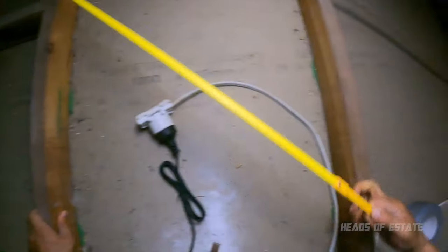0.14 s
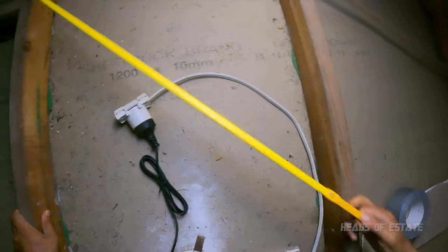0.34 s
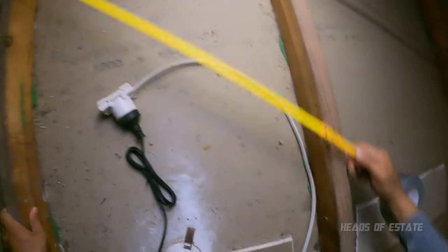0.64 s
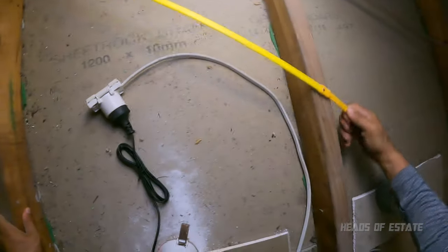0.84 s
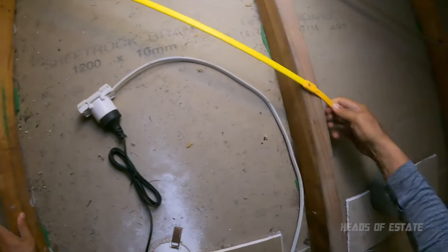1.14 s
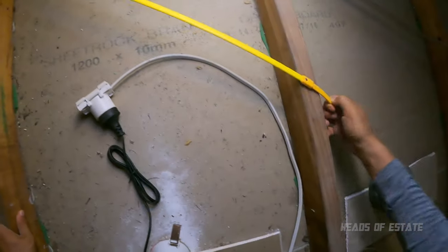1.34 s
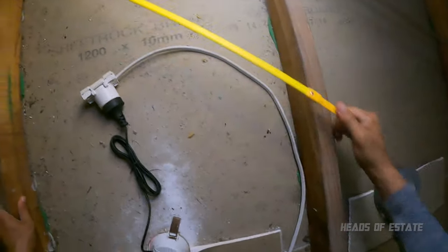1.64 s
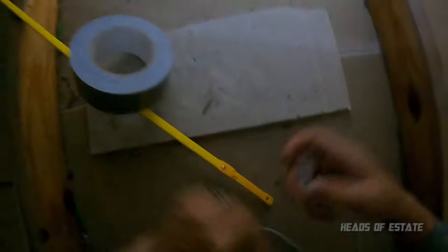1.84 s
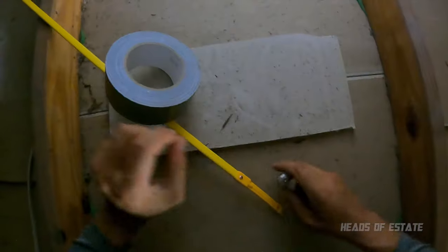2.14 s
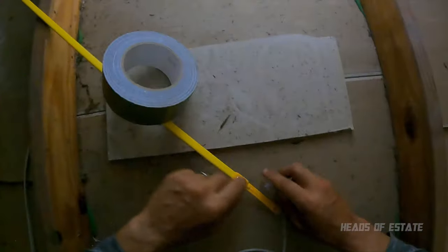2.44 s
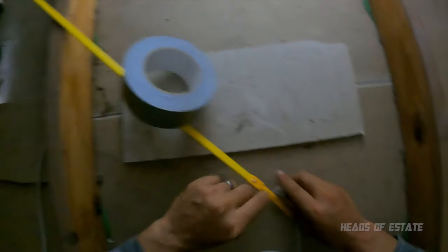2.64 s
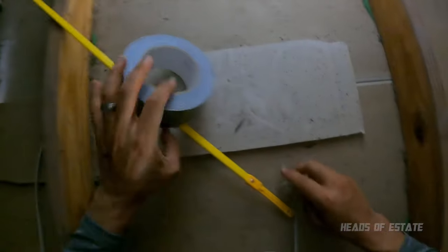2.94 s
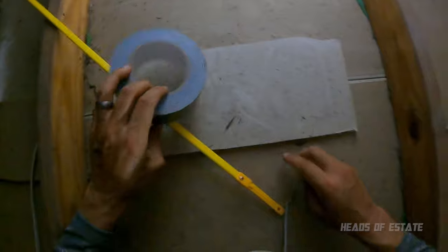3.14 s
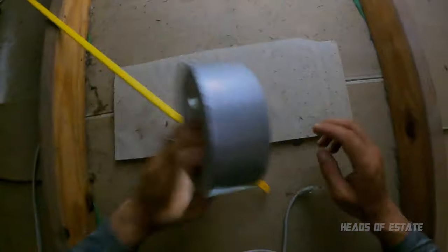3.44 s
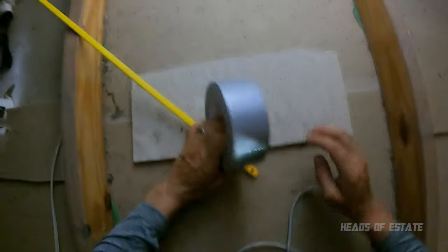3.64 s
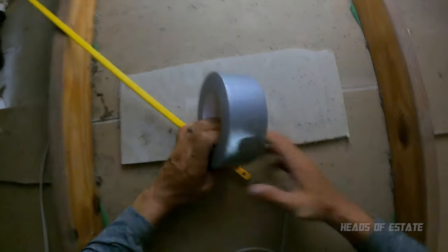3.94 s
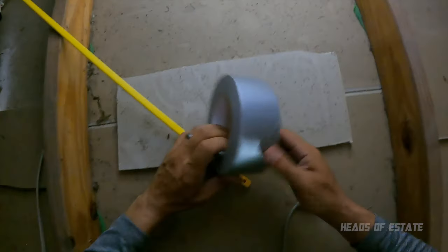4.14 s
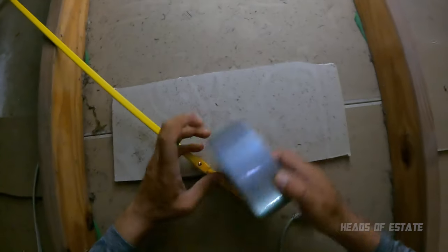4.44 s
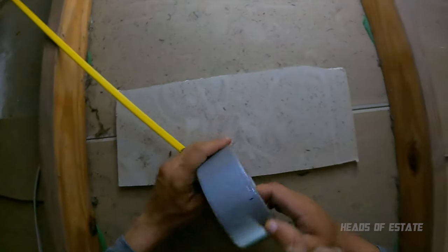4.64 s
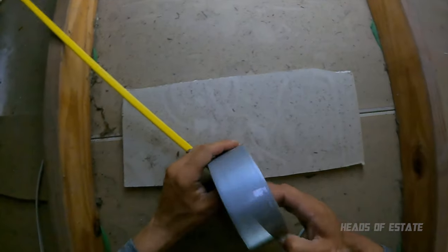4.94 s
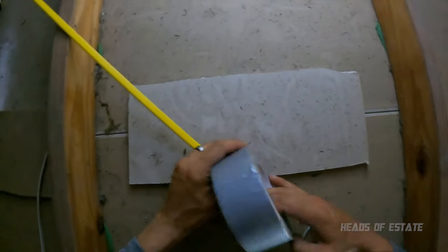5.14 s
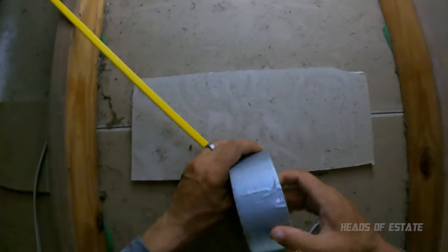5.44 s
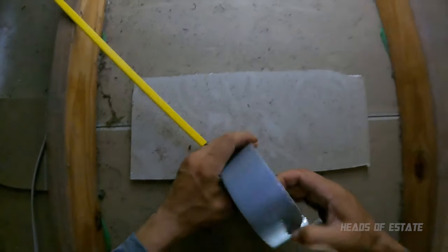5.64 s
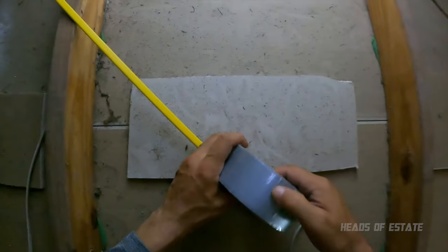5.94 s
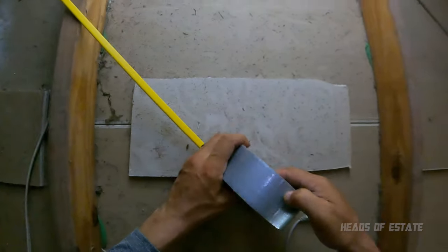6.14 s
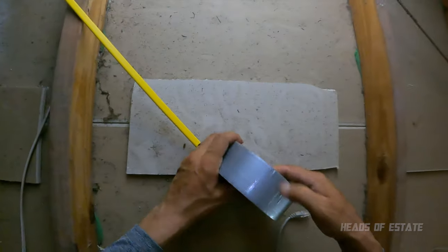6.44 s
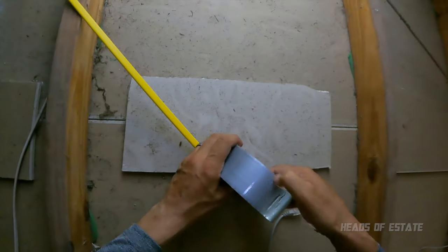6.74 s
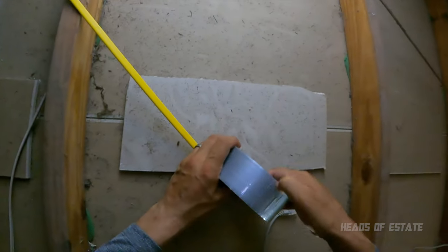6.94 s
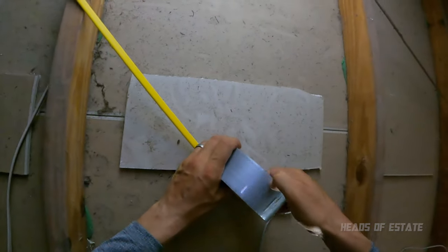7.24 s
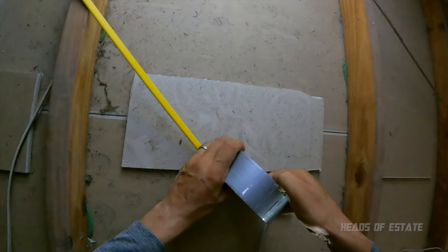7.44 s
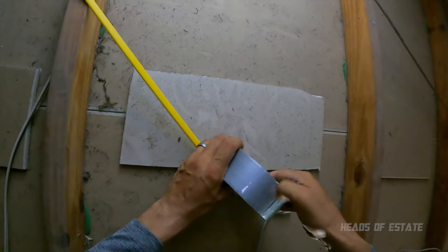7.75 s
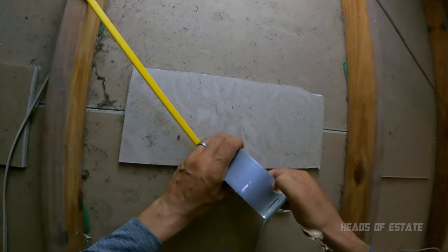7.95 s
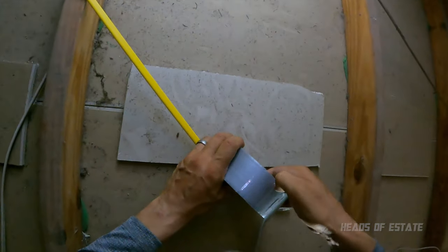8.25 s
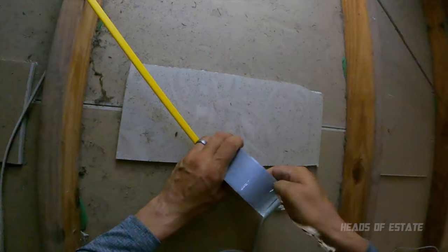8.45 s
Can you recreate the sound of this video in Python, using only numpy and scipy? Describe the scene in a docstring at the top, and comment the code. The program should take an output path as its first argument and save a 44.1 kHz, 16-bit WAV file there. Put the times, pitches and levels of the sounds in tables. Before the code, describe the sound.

In a low roof space, a rod scrapes and knocks over plasterboard while knees thud on the joists. A roll of duct tape is then slid and picked up with hollow knocks and sharp snaps. Fingers rub the roll, a nail ticks at its edge, and tape lifts in short snaps. Sleeves rustle close to a head-worn stereo microphone, and machines below give a low pulsing hum.

```python
"""A low roof space, heard from a head-worn stereo camera with the hands working close to its microphones.
A rod and a tape roll scrape over plasterboard, their friction ringing the board; sleeves rustle.
Tape lifts off the roll in short snaps, board and roll give hollow knocks, and knees on the joists
thud through the ceiling. Farther off, below, two machines hum nearly in unison and beat."""
import sys
import numpy as np
from scipy import signal
from scipy.fft import rfft, irfft, next_fast_len
from scipy.io import wavfile
from scipy.ndimage import uniform_filter1d, map_coordinates

SR = 44100
rng = np.random.default_rng(int(sys.argv[2]) if len(sys.argv) > 2 else 0)


def store_pcm(level_fs):
    """Save levels as 16-bit WAV."""
    pcm = np.round(np.clip(level_fs, -1, 1) * 32767).astype(np.int16)
    wavfile.write(sys.argv[1], SR, np.atleast_2d(pcm).T)


N = 379701
T = np.arange(N) / SR
CONTROL_T = np.arange(0, N / SR + .01, .002)  # coarse time grid for slow gains

# strokes of hand, rod, roll and cloth:
# (time [s], rise [s], fall [s], scrape level [dB], rustle re scrape [dB], weight re scrape [dB])
STROKES = [(.09, 0.18, 0.59, -43, -27, 2.5), (0.134, 0.031, 0.022, -48, -11, 4.5),
           (0.259, 0.052, 0.22, -40.5, -6.5, -4), (.56, 0.044, 0.072, -51, -10, 11.5),
           (0.648, 0.017, 0.15, -46, -2.5, 1), (.94, 0.065, 0.033, -40.5, -13, 2.5),
           (1.05, 0.12, 0.26, -41, -17, -2), (1.201, 0.083, 0.06, -40.5, -7, 5),
           (1.41, 0.04, 0.05, -38.5, -11, 1), (1.56, 0.11, 0.034, -33.5, -12.5, -1.5),
           (1.702, 0.12, 0.056, -29, -9, -0.5), (1.854, 0.012, 0.042, -38, -8, 5),
           (1.9, 0.025, 0.068, -34, -11.5, 2.5), (1.95, 0.062, 0.079, -30.5, -10.5, -4),
           (2.241, 0.15, 0.091, -33, -9, -15), (2.33, 0.16, 0.088, -30, -14, 3),
           (2.49, 0.063, 0.17, -31, -12, -2.5), (2.64, 0.026, 0.023, -34, -12, -12),
           (2.891, 0.06, 0.065, -38, 2, 7.5), (2.95, 0.062, 0.14, -23.5, -13, -4.5),
           (3.07, .07, 0.17, -28.5, -12.5, 1.5), (3.25, 0.1, 0.11, -30, -13, -1),
           (3.366, 0.053, 0.019, -33, -5, 4.5), (3.64, 0.04, 0.064, -35, -26, 11),
           (4.07, 0.28, 0.094, -56.5, -0.5, 1.5), (4.19, 0.0098, 0.089, -54.5, 3, -4),
           (4.3, 0.12, 0.18, -58, 1, 5), (4.43, 0.021, 0.082, -56, 3.5, 2),
           (4.54, 0.064, 0.095, -45, -9.5, -3), (4.65, 0.045, 0.042, -42, -7.5, 0.5),
           (4.78, 0.13, 0.68, -39.5, -9, -4.5), (5.0, 0.048, 0.052, -33.5, -6, -4.5),
           (5.149, 0.15, 0.032, -40.5, 3.5, 1.5), (5.42, 0.083, 0.13, -34, -10.5, -1),
           (5.56, 0.059, 0.11, -32.5, -12, 3.5), (5.66, .06, 0.16, -32, -9.5, -7),
           (5.77, 0.069, 0.03, -33, -4, 1.5), (5.92, 0.06, 0.031, -53, 0, -4),
           (6.09, 0.12, 0.12, -40.5, -26, 2), (6.26, 0.11, 0.092, -45, -1, 9),
           (6.4, 0.099, 0.069, -45, 1.5, 13), (6.522, 0.059, 0.021, -47, 5.5, 13),
           (6.7, 0.081, 0.055, -35.5, -7, -4), (6.85, 0.15, 0.15, -29, -8.5, -9),
           (7.02, 0.067, 0.077, -30, -10, -4), (7.25, 0.38, 0.3, -35.5, -14, -12),
           (7.55, 0.052, 0.0083, -42, 4.5, 7), (7.9, 0.09, 0.088, -38, -23, -9),
           (8.03, 0.08, 0.078, -34, -8, 1), (8.16, 0.059, 0.066, -35.5, -18, -5),
           (8.45, 0.18, 0.022, -38, -9, -11)]
# faint rubbing between strokes: (time [s], level re hum [dB])
IDLE_RUB = [(0, -21), (1.84, -28.5), (1.86, -26), (3.5, -17), (4.2, -30.5), (5.85, -21.5), (8.46, -23),
            (8.49, -38), (8.61, -20)]
# brief flares of the finest rustle: (time [s], half-width [s], level [dB])
FLARES = [(.1, 0.028, -47), (0.27, 0.061, -46), (1.368, 0.028, -46), (1.683, .05, -38), (2.854, 0.074, -45),
          (4.06, .03, -52), (4.292, 0.034, -48), (4.65, .02, -53), (5.6, 0.14, -44), (5.738, .04, -39),
          (5.921, 0.025, -40.5), (6.09, 0.015, -47), (6.27, 0.014, -61), (6.403, .02, -42),
          (6.487, 0.017, -43), (7.624, 0.028, -38), (8.437, 0.023, -42), (8.465, 0.011, -36)]
# plasterboard resonances: (frequency [Hz], width [Hz], level [dB])
BOARD_MODES = [(612, 42, 5), (786, 35, 0), (950, 110, 2), (1380, 150, 1), (1840, 45, 10), (2570, 130, 3),
               (3100, 120, -2), (4200, 250, -2), (5400, 400, -2), (6600, 200, -2), (7700, 250, 0)]
# scrape pressed on the board: (frequency [Hz], level [dB])
BOARD_SCRAPE = [(500, -99), (850, 2), (1420, 1), (1660, 0.5), (1840, -3.5), (2120, -3.5), (4500, -15.5),
                (5850, -21.5), (9900, -120)]
# the board's body with weight on it: (frequency [Hz], level [dB])
BOARD_BODY = [(120, -14), (200, -5), (394, -10.5), (839, -17.5), (950, -29.5), (1240, -54), (2090, -120)]
# the rod's duller tone: (frequency [Hz], gain [dB])
ROD_COLOUR = [(1700, 1), (1840, 0), (2000, 3), (2600, -4.5), (5000, -0.5)]
# tone of the roll turned between the hands: (frequency [Hz], gain [dB])
HAND_COLOUR = [(350, 0.5), (550, 4), (780, -7.5), (1000, -1), (2000, 0.5), (2600, 1.5), (3300, 0)]
# fingers on the lifted roll: (frequency [Hz], level [dB])
ROLL_SCRAPE = [(500, -88), (850, -10), (1040, 0), (1270, -7.5), (1440, -3.5), (1650, -5.5), (2100, -9),
               (2750, -12), (3200, -18), (4500, -25), (5850, -24.5), (9900, -120)]
# body of the roll held in the air: (frequency [Hz], level [dB])
ROLL_BODY = [(120, -44), (200, -2), (318, -14.5), (425, -8), (800, -22), (1040, -99), (1760, -120)]
# rustle of sleeves and surfaces: (frequency [Hz], level [dB])
RUSTLE = [(1760, -5), (3000, -6), (3270, -2.5), (3760, -2), (5950, -4), (7430, -8), (8500, -15),
          (11000, -38), (18700, -120)]
# finest rustle, as heard through the microphone ports: (frequency [Hz], level [dB])
FINE_RUSTLE = [(4710, -15), (8000, -6), (10900, -11), (12300, -11.5), (13800, -22), (14800, -38)]
# quick slides on tape: (time [s], length [s], level [dB], hiss centre [Hz], fine rustle re hiss [dB])
SLIDES = [(0.341, 0.053, -38.5, 4730, -25), (1.694, 0.069, -34.5, 4400, -19),
          (3.26, 0.051, -24.5, 6030, -12), (5.134, 0.042, -33.5, 6000, -1),
          (6.577, 0.043, -36.5, 8750, -15), (7.54, 0.15, -44, 5000, -19)]
# snaps of tape, nail and rod:
# (time [s], peak [dB], ring [Hz], rattle re crack [dB], treble slope [24 dB/octave], left re right [dB])
SNAPS = [(0.433, -11, 7200, -4, -0.41, 2), (0.798, -18.5, 2730, -8, -0.79, -1),
         (2.0402, -10, 2200, -19, -0.93, 0), (3.3866, -2, 5340, -14, -0.81, -2),
         (3.5595, -0.5, 6150, -17, -0.59, 0), (3.5789, -7, 2950, -5, -0.93, -1),
         (3.627, -21, 3030, -8, -0.66, 3), (3.768, -43, 3610, -17.5, -0.33, -11),
         (4.2884, -26, 5770, -3, 0.12, -2), (4.6394, -29, 2500, -4, -0.0056, -1),
         (5.246, -25, 2150, -7, -0.6, -1), (7.6058, -13, 5500, -7, -0.096, -1),
         (7.6105, -14, 2330, -8, -0.53, 0), (7.612, -22, 3000, -6, 0.0021, -4),
         (7.62, -7.5, 12000, -6, 0.11, -0.5), (8.264, -24, 2520, -12, -0.78, 0),
         (8.4586, -10.5, 12000, -12, -0.19, -5), (8.4614, -5.5, 2420, -13, -0.28, -3),
         (8.4651, -8, 3870, -9, 0.04, 1)]
# hollow knocks on board and roll: (time [s], peak [dB], first ring [Hz], second ring [Hz],
# second re first [dB], t60 [s], rattle re peak [dB], left re right [dB])
KNOCKS = [(.3205, -20.5, 656, 1336, 0, 0.11, -14, 8), (.333, -18.5, 321, 1330, 1, 0.087, -13, 14),
          (.354, -15, 644, 1280, -2, 0.031, -20, 2), (.3595, -10, 594, 1245, -2, 0.049, -25, 7),
          (.368, -15.5, 608, 930, -5, 0.089, -32, 7), (0.434, -20.5, 1230, 2230, -5, 0.038, -6.5, 17),
          (0.446, -15.5, 930, 765, -11, 0.058, -13.5, 9), (.798, -18, 804, 1487, -4.5, 0.096, -14, 8),
          (2.0405, -8.5, 650, 1890, 2, 0.015, -19, 1), (2.043, -14, 890, 1220, -6, 0.072, -14.5, 4),
          (2.506, -20.5, 1070, 1480, -13, 0.027, -13, 2), (2.647, -20.5, 680, 1060, -3, 0.044, -12, 1),
          (3.388, -10, 1082, 1240, -4, 0.078, -20, 3), (3.56, -10, 796, 1160, -3, 0.036, -17, 1),
          (3.579, -9, 780, 1100, 1, 0.089, -13.5, -1), (3.596, -7.5, 320, 780, -14, 0.067, -30, -1),
          (4.181, -39, 800, 1190, -16, 0.091, -28, -2), (5.2465, -24, 500, 1650, -5, 0.019, -5.5, -1),
          (5.253, -24.5, 750, 840, -7, 0.072, -27, 3), (5.267, -21, 430, 950, -7, 0.044, -25, 2),
          (5.291, -28, 560, 1400, -19, 0.037, -23, 3), (6.3495, -22, 570, 1340, 11, 0.015, -22, 4),
          (7.6055, -15, 1206, 1400, 3, 0.041, -22.5, 1.5), (8.460, -15.5, 487, 1300, 13, 0.017, -20, 2)]
# fingernail on the roll: (time [s], peak [dB], low ring [Hz], high ring [Hz], high re low [dB])
NAIL_TICKS = [(6.0823, -26.5, 2800, 3720, -3), (6.0853, -23, 1880, 2800, 2), (6.238, -32, 2000, 3900, 4),
              (6.3494, -18, 2720, 3500, 1.5)]
# dull blows on the ceiling: (time [s], peak [dB], most excited frequency [Hz], t60 scale [ratio])
THUDS = [(0.3205, -12.5, 200, 0.5), (0.328, -6, 70, 1.2), (0.355, 1.5, 130, 0.64), (0.408, -6.5, 80, 1.7),
         (1.877, -27, 96.9, 0.9), (2.041, -11.5, 200, 0.39), (3.597, -1.5, 215, 0.29),
         (3.612, -3, 63.3, 1.4), (3.658, -9, 64, 1.7), (4.184, -28, 42.7, 1.1), (5.247, -20, 260, 0.34),
         (5.25, -7, 40.4, 1.5), (5.54, -8, 157, 0.44), (5.71, -13, 80.7, 0.82), (5.842, -11.5, 40.4, 0.97),
         (8.463, -19, 48, 0.6), (8.494, -9, 41.7, 0.63)]
# low modes of the ceiling: (frequency [Hz], level [dB], base t60 [s])
CEILING_MODES = [(40.4, 1.5, 0.16), (64.9, -2, 0.59), (123, 4.5, 0.15), (191, -14, 0.03), (217, 0, 0.21),
                 (283, 6.5, 0.27)]
# weight shifts on the frame: (time [s], rise [s], fall [s], deep bass [dB], upper re deep bass [dB])
WEIGHT_SHIFTS = [(.04, 0.028, 0.026, -22, -6.5), (.14, 0.062, 0.09, -21, -8), (.35, 0.022, 0.19, -20.5, 1),
                 (.87, 0.029, 0.18, -34, 3.5), (1.1, 0.081, 0.084, -40, -13),
                 (1.209, 0.043, 0.071, -29, 2.5), (1.3, 0.039, 0.056, -17.5, -16),
                 (1.57, 0.076, 0.16, -19.5, -31), (1.71, 0.038, 0.043, -23.5, -3),
                 (1.871, 0.011, 0.097, -15, -7.5), (2.5, 0.022, 0.061, -23, 3),
                 (2.58, 0.1, 0.088, -21, -10), (3.082, 0.33, 0.062, -16.5, -22), (3.29, 0.15, 0.1, -21, -6),
                 (3.62, 0.054, 0.11, -20, -4), (3.84, 0.094, 0.082, -21, -25),
                 (4.21, 0.042, 0.039, -27, -20), (4.44, 0.17, 0.12, -32, -15),
                 (4.8, 0.076, 0.36, -32.5, -15), (5.13, 0.098, 0.043, -28, -10),
                 (5.3, 0.068, 0.062, -17, -13), (5.57, 0.072, 0.049, -27.5, 8),
                 (5.74, 0.052, 0.033, -16, -21), (5.89, 0.056, 0.088, -15.5, -42),
                 (6.27, 0.056, 0.66, -25.5, -5), (6.75, 0.13, 0.14, -21.5, -14),
                 (7.2, 0.085, 0.32, -24.5, -6.5), (7.62, 0.3, 0.3, -24, -3), (8.2, 0.13, 0.27, -24.5, -26),
                 (8.5, 0.059, 0.088, -11.5, -33)]
# the frame's deep bass: (frequency [Hz], level [dB])
FRAME_DEEP = [(8, -55), (19, -20), (28, 1.5), (40, 0.5), (65, -4), (82, -0.5), (96, -10.5), (130, -67),
              (300, -120)]
# the frame's upper bass: (frequency [Hz], level [dB])
FRAME_UPPER = [(40, -120), (100, -5.5), (116, 1.5), (160, -0.5), (220, -4.5), (260, -8.5), (330, -14),
               (700, -120)]
# timing of the hum's beat: (start of stretch [s], time of a beat minimum [s])
BEAT_TIMING = [(0, .34), (1.845, 2.036)]
# machine whine: (frequency [Hz], level re hum [dB])
WHINE = [(425.3, -36)]
# the background sinks around loud moments and creeps back: (time [s], sink [s], return [s], depth [dB])
DIPS = [(.2, .4, 0.25, 6.5), (1.33, 0.29, 0.091, -0.5), (6.05, 0.12, 0.16, 1.5), (0.601, 0.28, 0.68, 17.5),
        (2.15, 0.37, 0.34, 12.5), (3.4, 0.44, 0.61, 7), (4.049, 0.29, 0.71, 26.5), (5.4, 0.44, 0.96, 8.5),
        (7.09, 0.055, 0.047, 2), (8.06, .06, 0.044, 3.5), (8.62, 0.092, 1, 9.5)]
# decay of the roof space: (frequency [Hz], t60 [s])
ROOF_DECAY = [(150, 0.77), (1000, 0.46), (4000, 0.082), (12000, 0.12)]
# stereo width at the microphones: (frequency [Hz], side re mid [dB])
STEREO_WIDTH = [(30, -27), (60, -34), (110, -24.5), (200, -18.5), (370, -12.5), (690, -10), (1260, -11),
                (2320, -6.5), (4260, -10.5), (7830, -8.5), (11000, -8.5), (14400, 0)]
# treble loss in the microphone ports: (frequency [Hz], gain [dB])
MIC_PORTS = [(100, -1.5), (7000, -3), (9000, -7.5), (12500, -12.5), (14000, -18), (15000, -39.5)]

ROD_UNTIL_S, IN_HAND_FROM_S, LIFTED_FROM_S = 1.845, 4.45, 5.85
STROKE_SHAPE, RATTLE_SHAPE = 2.18, 1  # exponents for swells()
IDLE_RUSTLE_DB, IDLE_WEIGHT_DB = -5.5, 2  # re the idle scrape
RATTLE_RUSTLE_DB, RATTLE_WEIGHT_DB = -13.5, 6  # re the rattle's scrape
RATTLE_FALL, RING_LASTS = 0.56, 0.93  # shares of a knock's t60
FINE_DB, FINE_SLOPE = -4, 1.25  # the finest rustle follows the rustle, more steeply
SNAP_T60_S, TICK_T60_S = 0.052, 0.011
DEEP_REST_DB, UPPER_REST_DB = -7.5, -15.5  # the frame at rest, re hum
PRESS_DB, DEEP_DIP_SHARE = -4.5, 0.4  # upper bass re stroke weight; share of the dips in the deep bass
HUM_DB, ROOF_DB, TOP_HZ = -16.5, -13.0, 15000


def rubbing(scrape, rustle, fine, weight):
    """Close up, friction of rod, roll and sleeves drives the board's resonances and hollow body."""
    rings = lambda f: sum(abs(peak(f, hz, width)) ** 2 * amp(db) for hz, width, db in BOARD_MODES)
    hollow = lambda f: .9 + rings(f)
    faint = lambda f: 3.9 + rings(f)  # a higher floor, so the resonances stand out less
    on_board = friction(lambda f: spectrum(BOARD_SCRAPE, f) * hollow(f), grit_db=1.0, rate=330)
    on_roll = friction(lambda f: spectrum(ROLL_SCRAPE, f) * faint(f), grit_db=1.0, rate=1100)
    cloth = friction(lambda f: spectrum(RUSTLE, f) * faint(f), grit_db=1.0, rate=890)
    fine_hiss = friction(fine_colour, grit_db=1.0, rate=260, lag=.3)
    board_body = friction(lambda f: spectrum(BOARD_BODY, f) * hollow(f), grit_db=1.5, rate=27)
    roll_body = friction(lambda f: spectrum(ROLL_BODY, f), grit_db=0.5, rate=110)
    on_board = np.where(T < ROD_UNTIL_S, coloured(on_board, ROD_COLOUR), on_board)
    on_board = np.where(T > IN_HAND_FROM_S, coloured(on_board, HAND_COLOUR), on_board)
    board_body = np.where(T > IN_HAND_FROM_S, coloured(board_body, HAND_COLOUR), board_body)
    lifted = T > LIFTED_FROM_S
    surface = scrape * np.where(lifted, on_roll, on_board) + rustle * cloth
    body = weight * np.where(lifted, roll_body, board_body)
    flutter = amp(1.05 * wobble(30))
    return flutter * (scratchy(surface, depth_db=2) + fine * fine_hiss + body) * pan(0.8)


def stroke_gains():
    """Strokes, and loose things shaking after knocks, lift the rubbing; only strokes press the frame."""
    rattles = [(s + 0.0055, .002, RATTLE_FALL * t60, db + rattle_db, RATTLE_RUSTLE_DB, RATTLE_WEIGHT_DB)
               for s, db, *_, t60, rattle_db, _ in KNOCKS]
    s, rise, fall, db, rustle_db, weight_db = np.transpose(STROKES + rattles)
    is_stroke = np.arange(len(s)) < len(STROKES)
    shape = swells(s, rise, fall, np.where(is_stroke, STROKE_SHAPE, RATTLE_SHAPE)[:, None])
    idle_db = hum_level_db() + np.interp(T, *np.transpose(IDLE_RUB))
    scrape = summed(shape, db, idle_db)
    rustle = summed(shape, db + rustle_db, idle_db + IDLE_RUSTLE_DB)
    fine = amp(FINE_DB) * summed(shape, db + FINE_SLOPE * rustle_db, idle_db + FINE_SLOPE * IDLE_RUSTLE_DB)
    weight = summed(shape, db + weight_db, idle_db + IDLE_WEIGHT_DB)
    pressure = summed(shape[is_stroke], (db + weight_db)[is_stroke], idle_db + IDLE_WEIGHT_DB)
    flare_s, width, flare_db = np.transpose(FLARES)
    flares = summed(swells(flare_s, width, width), flare_db, -np.inf)
    return scrape, rustle, np.hypot(fine, flares), weight, pressure


def tape_slides():
    """A fingertip or the roll slides fast over smooth tape: a short band of hiss."""
    out = np.zeros((2, N))
    hiss = friction(np.ones_like, grit_db=3.5, rate=170)
    for s, length, db, hz, fine_db in SLIDES:
        span = slice(round(s * SR) - SR // 4, round(s * SR) + SR // 4)
        swell = np.exp(-((T[span] - s) / (0.6 * length)) ** 4)
        colour = lambda f: abs(peak(f, hz, 0.63 * hz)) ** 2 + amp(fine_db) * fine_colour(f)
        out[:, span] += amp(db) * swell * unit(filtered(hiss[:, span], colour))
    return out


def snaps():
    """Tape, nail or rod snaps: a sharp crack with a short ring and a dying rattle."""
    out, t = np.zeros((2, N + SR)), T[:SR // 3]
    for s, db, hz, rattle_db, slope, pan_db in SNAPS:
        noise = rng.standard_normal((3, len(t)))  # shared, left, right
        crack = attack(t, 0.0004) * decay(t, 0.0044) * noise[0]
        rattle = amp(rattle_db) * decay(t, SNAP_T60_S) * (noise[0] + 1.03 * noise[1:])
        tilt = lambda f: (1j * f / (1800 + 1j * f)) ** 2 * (1 + 1j * f / 3500) ** (4 * slope)
        colour = lambda f: tilt(f) * (1 + 1.7 * peak(f, hz, 0.26 * hz))
        place(out, s, filtered(crack + rattle, colour), db, pan_db)
    return out[:, :N]


def knocks():
    """A hard push and chatter excite the board and two hollows of the struck thing, which ring on."""
    out, t = np.zeros((2, N + SR)), T[:SR // 3]
    board = lambda f: sum((-1) ** k * peak(f, hz, width + 120)
                          for k, (hz, width, _) in enumerate(BOARD_MODES[:6]))
    for s, db, hz1, hz2, second_db, t60, _, pan_db in KNOCKS:
        noise = rng.standard_normal((3, len(t)))
        push = 2.26 * decay(t, 0.00046) + decay(t, t60) * (noise[0] + 0.067 * noise[1:])
        hollows = lambda f: peak(f, hz1, 0.19 * hz1) - amp(second_db) * peak(f, hz2, 0.13 * hz2)
        chatter = filtered(push, lambda f: hollows(f) + 0.021 * board(f))
        ring = sine(hz1, t) - amp(second_db) * sine(hz2, t)
        ring *= attack(t, 0.00043) * decay(t, RING_LASTS * t60)
        place(out, s, chatter / abs(chatter).max() + amp(-2) * ring / abs(ring).max(), db, pan_db)
    return out[:, :N]


def nail_ticks():
    """A nail catches the tape's edge: a click and two short pitched rings."""
    out, t = np.zeros((2, N + SR)), T[:SR // 20]
    for s, db, low_hz, high_hz, high_db in NAIL_TICKS:
        ring = sine(low_hz, t) + amp(high_db) * sine(high_hz, t, rng.uniform(0, np.pi))
        ring *= attack(t, .0006) * decay(t, TICK_T60_S)
        click = 0.7 * decay(t, 0.0029) * rng.standard_normal(len(t))
        place(out, s, ring + click, db, pan_db=-1.5)
    return out[:, :N]


def knee_thuds():
    """A soft blow on a joist rings the ceiling's low modes, most those near its own pitch."""
    out, t = np.zeros(N + SR), T[:SR]
    for s, db, centre_hz, t60_scale in THUDS:
        ring = np.zeros(SR)
        for hz, mode_db, t60 in CEILING_MODES:
            gain = amp(mode_db + rng.normal(0, 0.67) - 11.4 * abs(np.log2(hz / centre_hz)))
            ring += gain * decay(t, t60 * t60_scale) * sine(hz * rng.normal(1, 0.0067), t)
        out[round(s * SR):][:SR] -= amp(db) * attack(t, 0.00076) * ring / abs(ring).max()
    return out[:N]


def frame_rumble(pressure):
    """The frame underfoot groans as weight shifts; strokes press into its upper bass."""
    s, rise, fall, db, upper_db = np.transpose(WEIGHT_SHIFTS)
    hum_db, shape = hum_level_db(), swells(s, rise, fall)
    deep = friction(lambda f: spectrum(FRAME_DEEP, f), grit_db=0.0, rate=8)
    upper = friction(lambda f: spectrum(FRAME_UPPER, f), grit_db=1.0, rate=30)
    deep_gain = summed(shape, db, HUM_DB + DEEP_DIP_SHARE * (hum_db - HUM_DB) + DEEP_REST_DB)
    upper_gain = summed(shape, db + upper_db, hum_db + UPPER_REST_DB)
    return deep_gain * deep + np.hypot(upper_gain, amp(PRESS_DB) * pressure) * upper


def machine_hum(low_hz=97.96, high_hz=99.97):
    """Two machines below the ceiling beat twice a second; a faint whine rides above."""
    starts, minima = np.transpose(BEAT_TIMING)
    beat_t = T - minima[np.searchsorted(starts, T, "right") - 1]
    low, high = (sine(hz, beat_t, 0.08 * wobble(6)) for hz in (low_hz, high_hz))
    whine = sum(amp(db + 8.1 * wobble(8)) * sine(hz, T, wobble(5.7)) for hz, db in WHINE)
    return amp(hum_level_db() + 0.36 * wobble(16)) * (low - 0.95 * high + whine)


def hum_level_db():
    """The hum's level with its dips, which the other steady sounds follow."""
    s, sink, back, depth_db = np.transpose(DIPS)
    return HUM_DB - np.interp(T, CONTROL_T, depth_db @ swells(s, sink, back))


def roof_reverb(x):
    """The low roof space answers; each frequency dies at its own speed."""
    hz, t, bands = signal.stft(rng.standard_normal((2, SR // 2)), SR, nperseg=256)
    tail = signal.istft(bands * decay(t, along(ROOF_DECAY, hz)[:, None]), SR, nperseg=256)[1]
    tail = 2.0 * tail[0] + .5 * tail  # mostly common to both microphones
    return signal.fftconvolve(x, tail / np.linalg.norm(tail[0]), axes=1)[:, :N]


def friction(response, grit_db, rate, lag=0.58):
    """Stereo noise of small uneven catches; lag is the share of the side due to delay between ports."""
    size = next_fast_len(N + 8192)
    f = np.fft.rfftfreq(size, 1 / SR)
    catches = rng.standard_normal((2, N)) * amp(grit_db * wobble(rate))
    mid, diffuse = rfft(catches, size) * response(f)
    side = (np.sqrt(1 - lag ** 2) * diffuse - 1j * lag * mid) * spectrum(STEREO_WIDTH, f)
    mid, side = irfft([mid, side], size)[:, :N]
    return np.array([mid + side, mid - side]) / np.std(mid)


def scratchy(x, depth_db):
    """Short resonances come and go: random gain in patches about 130 Hz wide and 40 ms long."""
    bands = signal.stft(x, nperseg=1024)[2]
    patches = rng.standard_normal(bands.shape[1:])
    for axis in (0, 1):
        patches = uniform_filter1d(patches, size=3, axis=axis)
    return signal.istft(bands * unit(amp(depth_db * unit(patches))), nperseg=1024)[1][:, :N]


def fine_colour(f):
    """Spectrum of the finest rustle before the ports dull it."""
    return spectrum(FINE_RUSTLE, f) / spectrum(MIC_PORTS, f)


def swells(s, rise, fall, shape=2):
    """One swell a row, 1 at time s; shape 1 is exponential, 2 a bell, more a flatter top."""
    late = CONTROL_T - s[:, None]
    return np.exp(-abs(late / np.where(late < 0, rise[:, None], fall[:, None])) ** shape)


def summed(shape, db, floor_db):
    """Gain per sample of swells that add their power to a floor."""
    return np.sqrt(np.interp(T, CONTROL_T, amp(db) ** 2 @ shape ** 2) + amp(floor_db) ** 2)


def place(out, s, sound, db, pan_db):
    """Adds a sound at its time, peak level and side."""
    start = round(s * SR)
    out[:, start:start + sound.shape[-1]] += sound / abs(sound).max() * amp(db) * pan(pan_db)


def pan(db):
    """Left and right gains, db apart."""
    return amp([[db / 2], [-db / 2]])


def amp(db):
    return 10 ** (np.asarray(db) / 20)


def sine(hz, t, phase=0):
    return np.sin(2 * np.pi * hz * t + phase)


def attack(t, rise_s):
    return 1 - np.exp(-t / rise_s)


def decay(t, t60):
    return amp(-60 * t / t60)


def unit(x):
    """Scaled to rms 1."""
    return x / np.sqrt(np.mean(x ** 2) + 1e-20)


def wobble(rate):
    """A smooth random curve, rate knots a second."""
    return map_coordinates(rng.standard_normal(int(N * rate / SR) + 4), [T * rate])


def peak(f, hz, width):
    """A causal resonance."""
    return 1j * f * width / (hz * hz - f * f + 1j * f * width)


def along(points, hz):
    """Interpolates (frequency, value) points on a log axis."""
    f, values = np.transpose(points)
    return np.interp(np.log(hz + 1), np.log(f + 1), values)


def spectrum(points, hz):
    """Linear gain of a dB curve at hz."""
    return amp(along(points, hz))


def filtered(x, response):
    """x through a complex frequency response."""
    length = x.shape[-1]
    size = next_fast_len(length + 8192)
    return irfft(rfft(x, size) * response(np.fft.rfftfreq(size, 1 / SR)), size)[..., :length]


def coloured(x, points):
    """x through a dB curve."""
    return filtered(x, lambda f: spectrum(points, f))


def scene():
    """All sources at the camera; only snaps, knocks and ticks set off the roof's reverberation."""
    impacts = snaps() + knocks() + nail_ticks()
    scrape, rustle, fine, weight, pressure = stroke_gains()
    rub = rubbing(scrape, rustle, fine, weight)
    hands = rub + impacts + amp(ROOF_DB) * roof_reverb(impacts) + tape_slides()
    return hands + knee_thuds() + frame_rumble(pressure) + machine_hum()


def record(dry):
    """The camera's microphones: ports dull the treble, loud peaks round off, the top band is cut."""
    dull = coloured(dry, MIC_PORTS)
    rounded = dull / (1 + abs(dull / .9) ** 4) ** .25
    return filtered(rounded, lambda hz: np.clip((TOP_HZ + 300 - hz) / 600, 0, 1) ** 2)


dry = scene()
out = record(dry)
store_pcm(out)
```